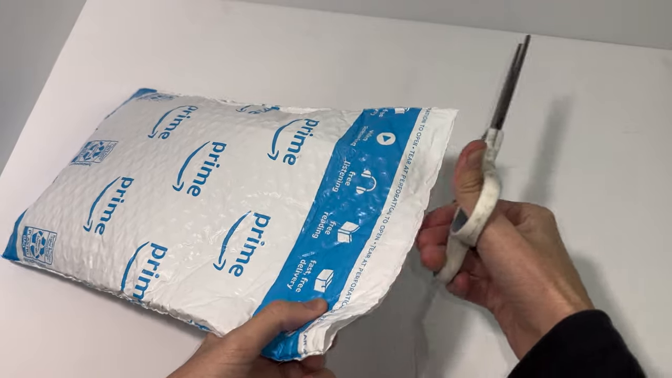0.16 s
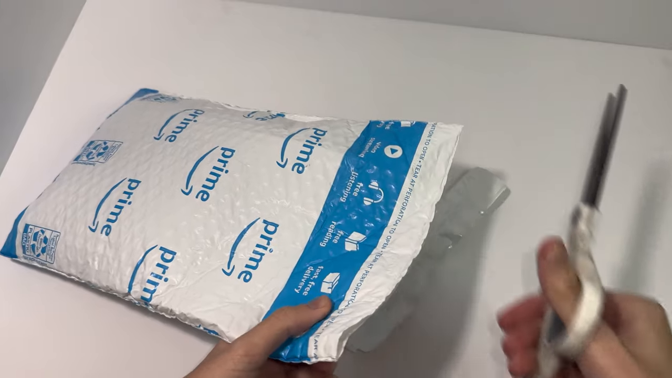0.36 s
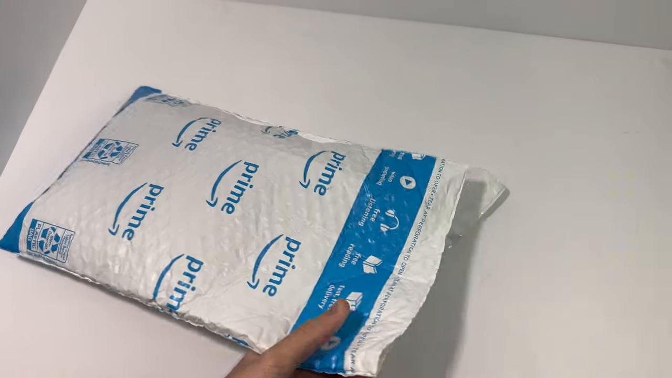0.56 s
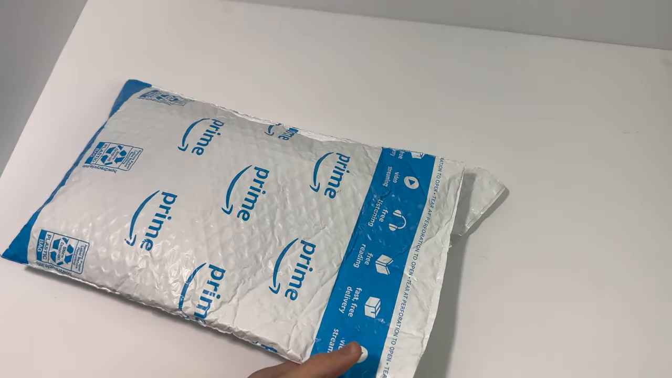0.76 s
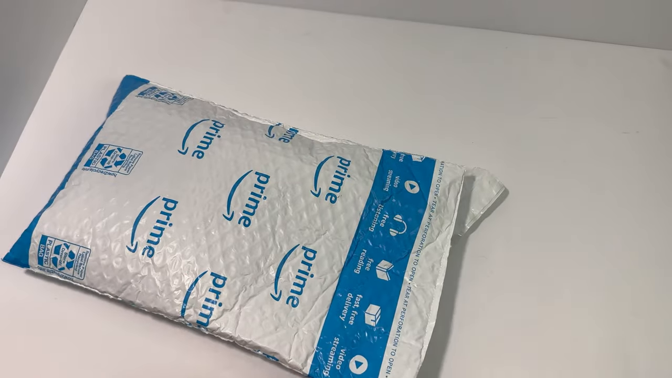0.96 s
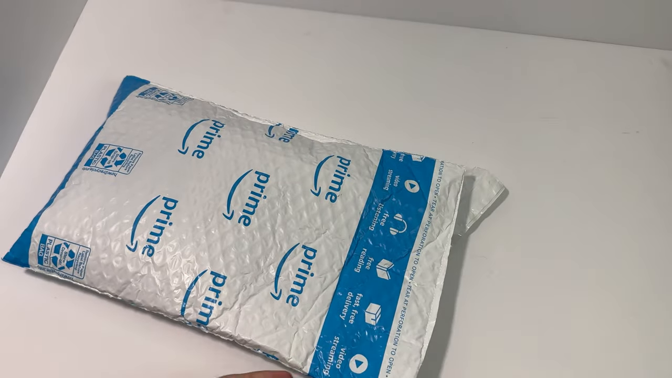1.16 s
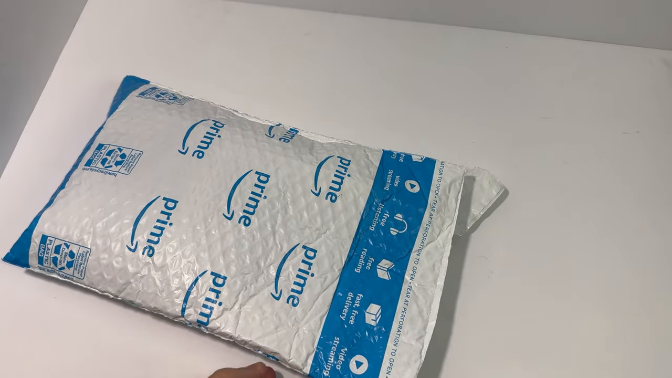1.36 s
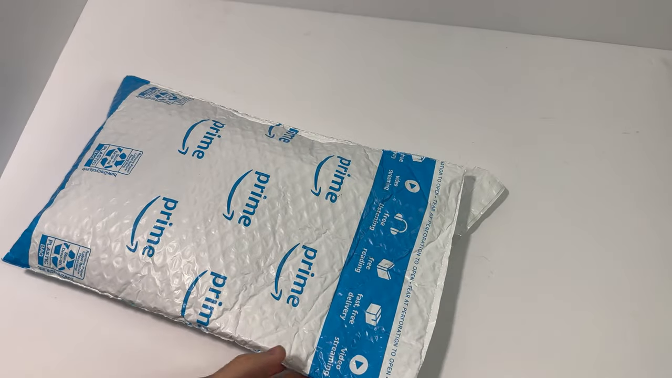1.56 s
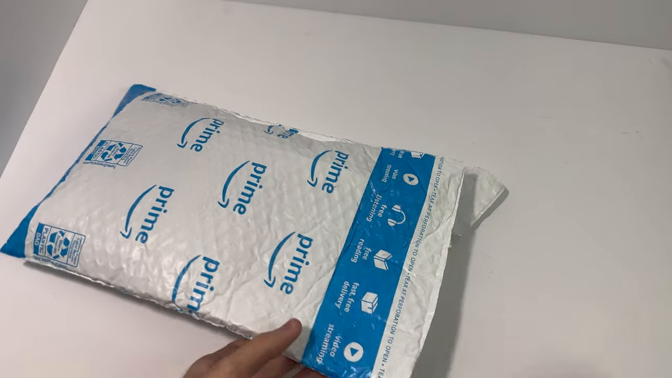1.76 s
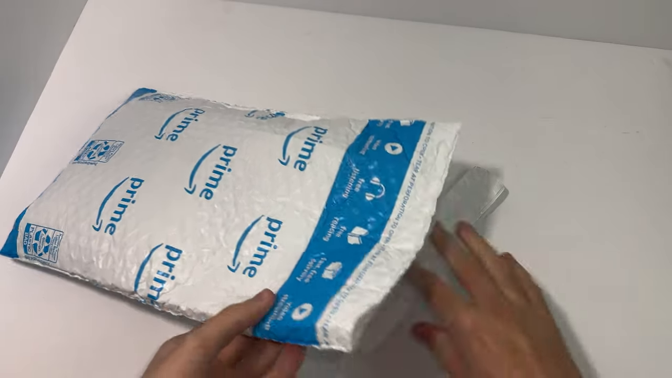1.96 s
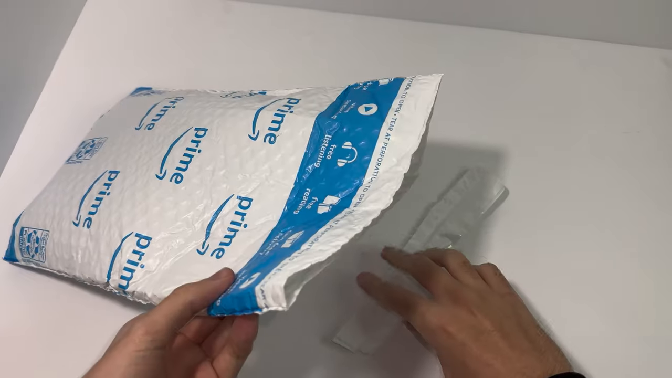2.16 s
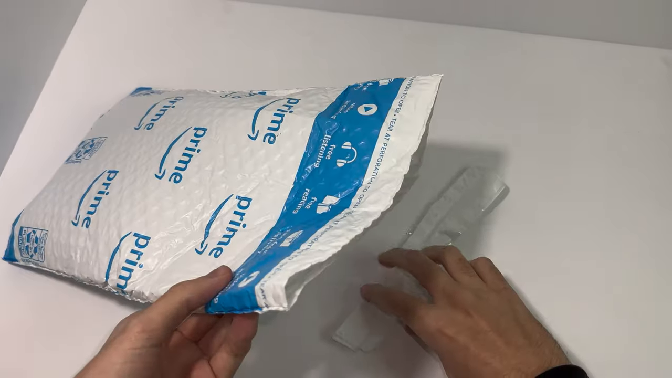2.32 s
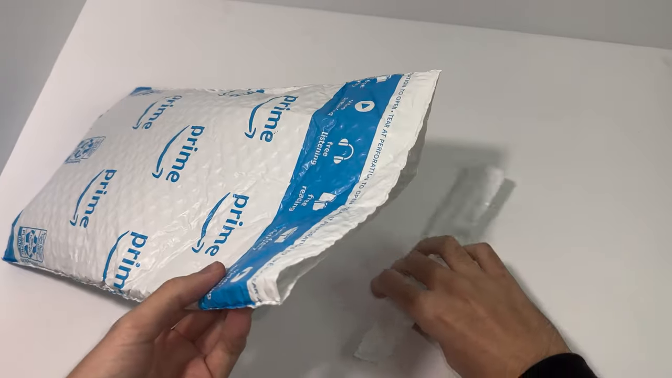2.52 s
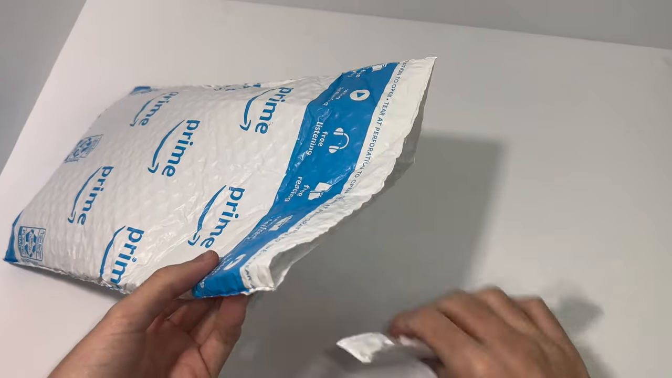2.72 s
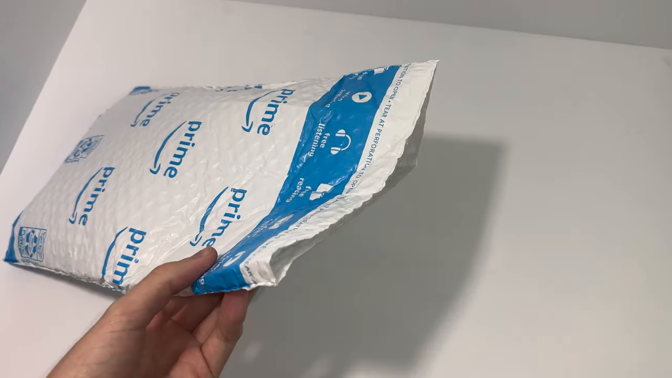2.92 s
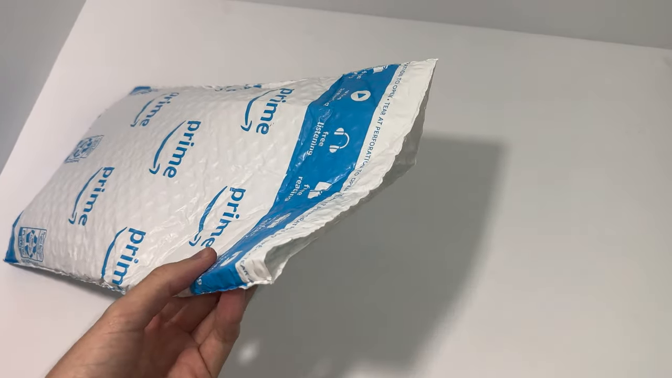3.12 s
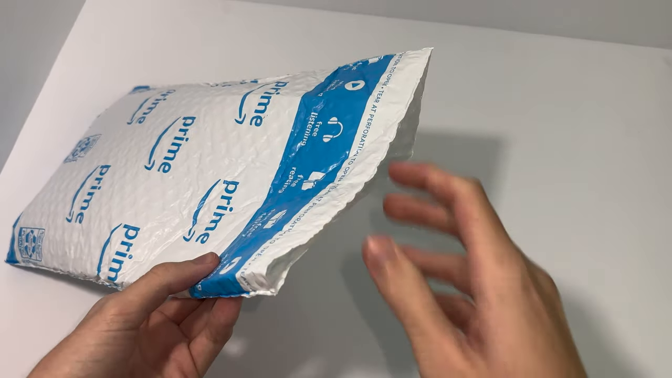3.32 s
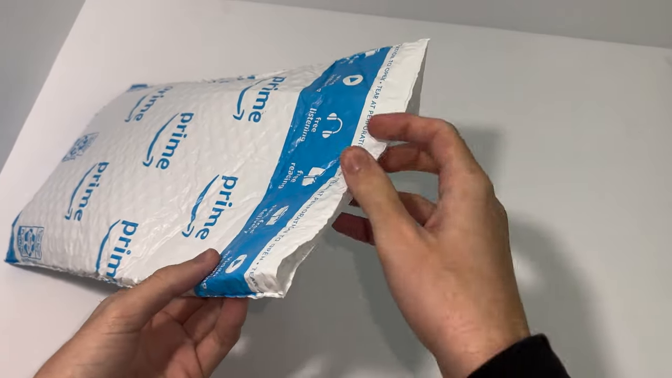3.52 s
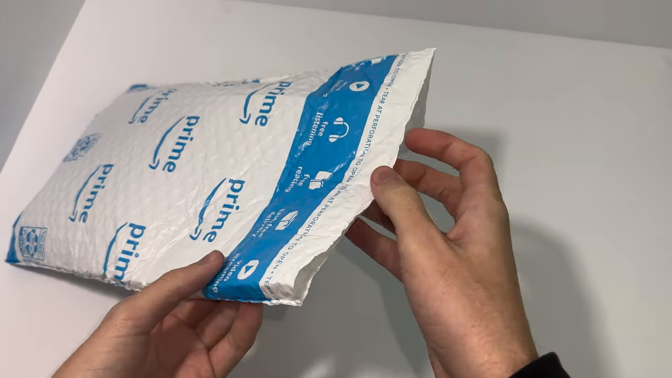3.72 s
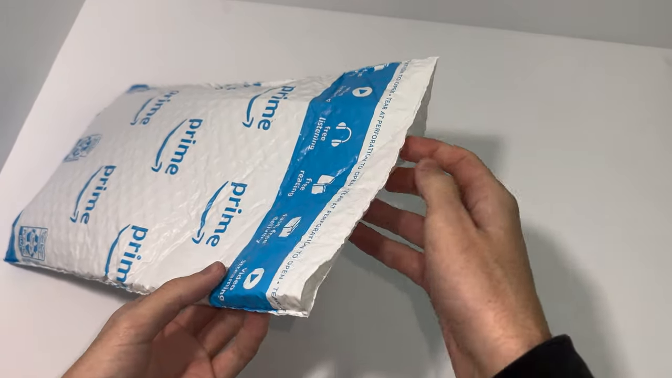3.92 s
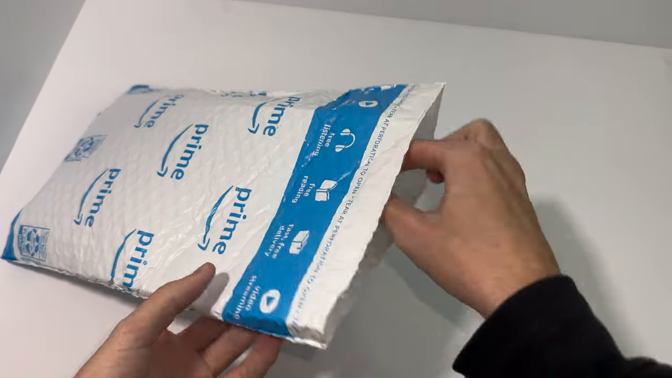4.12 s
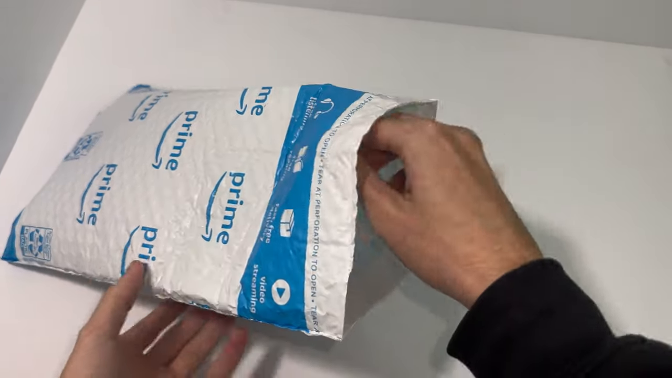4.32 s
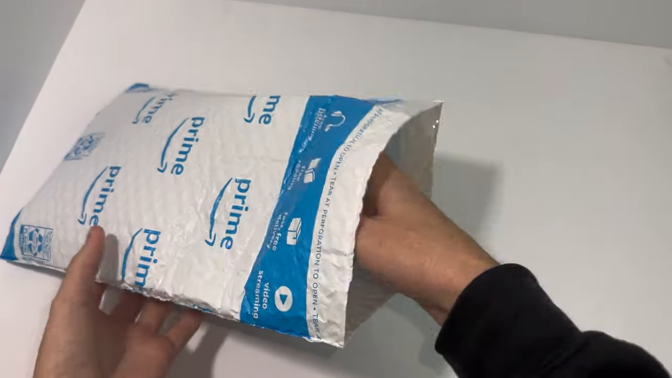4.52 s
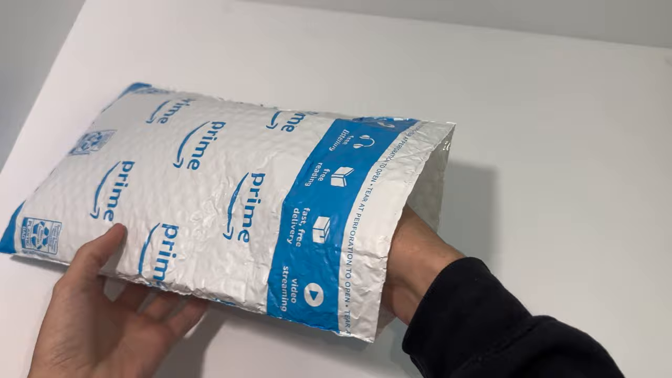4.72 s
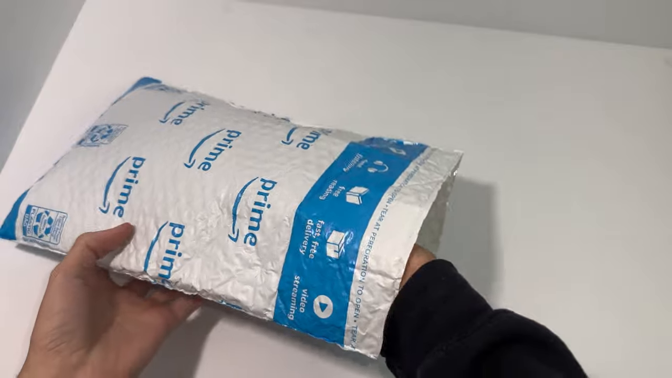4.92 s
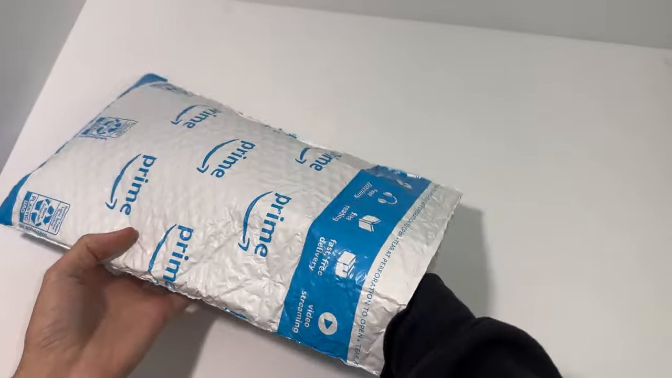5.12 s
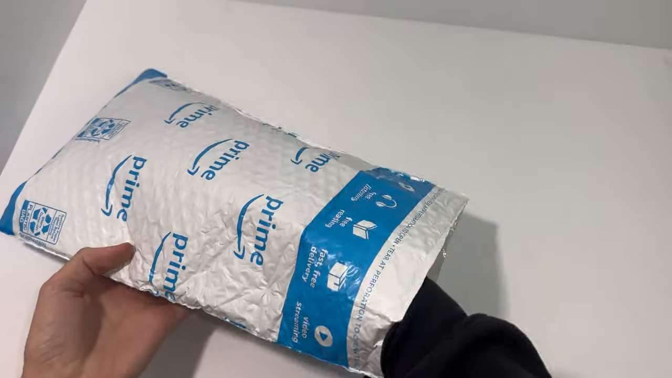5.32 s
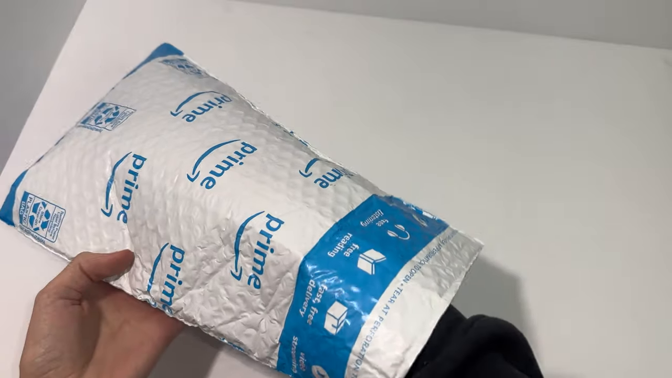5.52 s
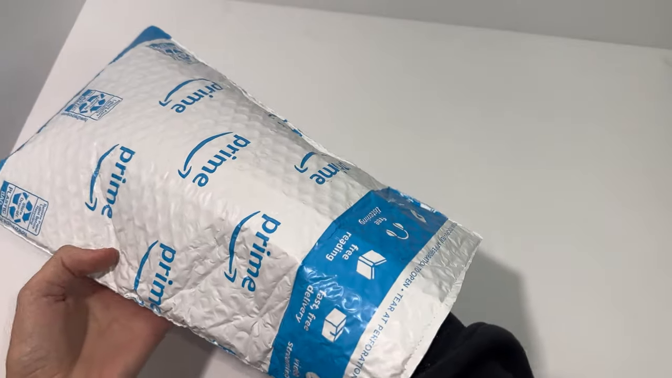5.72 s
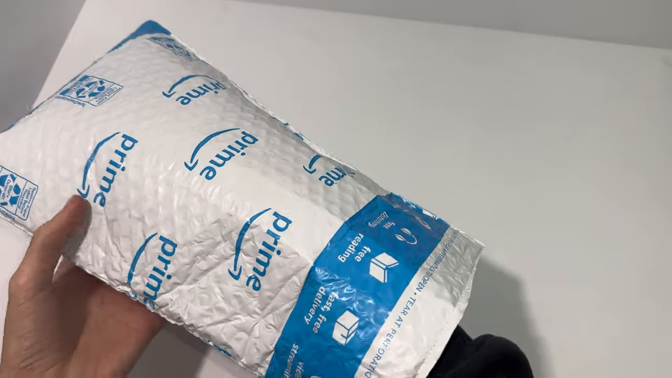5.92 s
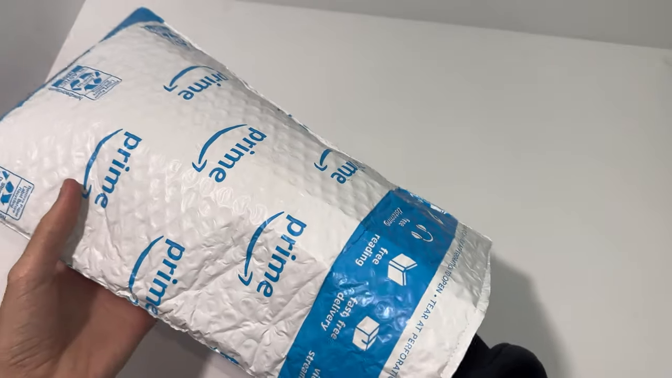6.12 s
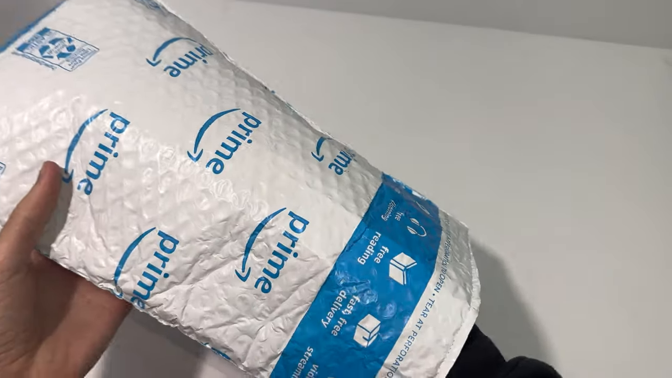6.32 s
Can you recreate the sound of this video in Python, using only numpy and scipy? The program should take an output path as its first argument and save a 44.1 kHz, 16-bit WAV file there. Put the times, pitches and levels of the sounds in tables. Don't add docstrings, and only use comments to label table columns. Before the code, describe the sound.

Bright, dry film snaps over soft bag rustle, then a short lull broken by scissors thudding twice on a resonant tabletop, the loudest moment. A few crinkles and a faint hiss as a cut strip is picked up, near quiet, then busy crackling as fingers open the padded bag and push deep inside. Small room, close microphones, soft fan behind.

```python
import sys
import numpy as np
from scipy import signal
from scipy.fft import rfft, irfft, next_fast_len
from scipy.io import wavfile
from scipy.ndimage import uniform_filter1d

SR = 44100
rng = np.random.default_rng(int(sys.argv[2]) if len(sys.argv) > 2 else 0)


def pcm_store(signal):
    levels = np.round(np.clip(np.atleast_2d(signal), -1, 1) * 32767)
    wavfile.write(sys.argv[1], SR, levels.astype(np.int16).T)


def to_linear_factor(level_db):
    exponent = np.asarray(level_db, float) / 20
    return 10 ** exponent


N = 280917

# [s, dB, dB]
SNAPS_CUT = [(0.0192, -27.5, 0), (0.0546, -15.5, 1.5), (0.105, -22, 10), (0.1334, -26, 10),
             (0.1711, -17.5, -7), (0.2235, -29, 5), (0.2666, -20.5, -3), (0.2754, -22.5, 6),
             (0.348, -27, -16), (0.3843, -22, 0.5), (0.4215, -24, 7), (0.45, -26, -6), (0.475, -24, 1),
             (0.4962, -19.5, -0.5), (0.5198, -13.5, 4), (0.554, -31, -11), (0.5752, -23, -4),
             (0.6045, -32, -14), (0.6875, -29.5, -1.5), (0.71, -33, 8), (0.7325, -28, -3.5),
             (0.775, -35.5, -11), (0.788, -28.5, 3), (0.871, -38, -14), (0.89, -34.5, -6.5),
             (0.9118, -34.5, -6), (0.9745, -35, -9), (0.987, -29.5, -7.5), (1.0823, -23, 6)]
# [s, dB, dB]
SNAPS_LIFT = [(1.2657, -30, -10), (1.295, -17, -21.5), (1.407, -44.5, -25), (1.4378, -41.5, 2),
              (1.5045, -37.5, -35), (1.529, -32.5, 0), (1.69, -33.5, -15), (1.695, -34, -6),
              (1.698, -35, -9), (1.723, -29.5, -3), (1.7973, -37, -11), (1.8372, -28.5, -11),
              (1.8446, -18.5, 3.5), (1.863, -30, -1), (1.8816, -17.5, -1.5), (1.932, -30.5, -7),
              (1.971, -17.5, 5.5), (1.9799, -21, -3), (2.011, -21.5, 2), (2.06, -28.5, 3), (2.08, -23, 1),
              (2.104, -32, 2), (2.171, -43, -19)]
# [s, dB, dB]
SNAPS_HELD = [(2.247, -33, -10), (2.2991, -33.5, -6), (2.366, -39, -4), (2.38, -29, -6.5),
              (2.4894, -30.5, -7), (2.623, -33, 3), (2.678, -30, 4), (2.84, -28, -2), (2.934, -38.5, -22),
              (2.9655, -35, -9), (2.998, -28.5, 3), (3.094, -39.5, -28), (3.147, -39, -4),
              (3.261, -41, -19)]
# [s, dB, dB]
SNAPS_OPEN = [(3.362, -38, -24), (3.378, -25.5, 9), (3.385, -16.5, -0.5), (3.391, -16.5, 19),
              (3.411, -14.5, 5.5), (3.5245, -22.5, 2), (3.551, -23, -0.5), (3.614, -25.5, 5),
              (3.647, -33.5, -15), (3.656, -30, 7), (3.696, -22, 4.5), (3.7634, -42, 0), (3.8298, -25, -1),
              (3.844, -33, 3), (3.8836, -28.5, 9), (3.8911, -29, -3), (4.015, -29, 2), (4.064, -19, 8),
              (4.0838, -11.5, 4), (4.1546, -18.5, 2), (4.181, -17.5, 10), (4.2458, -21.5, 2),
              (4.276, -21, 4), (4.3195, -18.5, 4.5), (4.3597, -27.5, -5), (4.413, -19, -3),
              (4.4428, -25, 6), (4.4516, -23, -2), (4.485, -23.5, 6), (4.4985, -21.5, 0.5)]
# [s, dB, dB]
SNAPS_REACH = [(4.5466, -28.5, 4), (4.564, -25, 8), (4.589, -28, 5), (4.606, -23, -5), (4.626, -24, 8),
               (4.6958, -13.5, -1), (4.7858, -26.5, 8), (4.934, -21, 1.5), (4.969, -22.5, -1),
               (5.0109, -17, -3), (5.077, -20, 0), (5.178, -26, 21), (5.3058, -27, -26),
               (5.3538, -12.5, 19), (5.4022, -18.5, -12), (5.4328, -21, 0), (5.7268, -19.5, -4.5),
               (5.915, -23, -1), (5.972, -27, 10), (6.178, -23, -17), (6.2413, -47, 4),
               (6.276, -22.5, -4.5),
               (4.9095, -27, -1), (4.996, -23, -4), (5.096, -22, 7), (5.1314, -36, 1), (5.148, -23, -2),
              (5.17, -26, -3), (5.249, -21, -6), (5.3332, -19, -8), (5.341, -16.5, 3), (5.5605, -26, 4),
              (5.3584, -16, 11), (5.3685, -26, 6), (5.422, -24, -11), (5.4379, -28, 0), (5.484, -21.5, -14),
              (5.6172, -34, -7), (5.875, -21, 6), (5.757, -36, -8), (5.835, -18.5, 2), (5.911, -15.5, -4.5),
              (5.9905, -31, 2), (6.0466, -20, -7), (6.109, -23, 1), (6.1336, -25, -13), (6.21, -37, -13),
              (6.077, -26, 4)]
# [s, dB, dB]
SNAPS_MORE = [(0.2549, -40, -6), (0.397, -42, -1), (0.4074, -29, -4), (0.8333, -41, -16), (0.8943, -38, 0),
              (0.9402, -47, -11), (1.6127, -65, -5), (1.7524, -38, -16), (1.9509, -36, -9),
              (2.4304, -44, -9), (2.51, -45, 2), (2.528, -39, -1), (2.5794, -32.5, 1), (2.7192, -41, -9),
              (2.7374, -37, -2), (2.7451, -39.5, -7), (3.0649, -47, -11), (3.084, -42.5, -8),
              (3.1865, -44, -8), (3.2161, -38, -6), (3.2485, -42, -5), (3.3046, -50, -12),
              (3.332, -47, -12), (3.6831, -33, 4), (3.9186, -49, 4), (3.965, -43, 2), (4.0023, -35, 2),
              (4.038, -29.5, 9), (4.044, -28, 14), (4.2042, -22, 3), (4.4738, -26, 4.5),
              (4.6509, -21.5, 7), (4.7653, -37, 3.5), (4.8025, -29, -2), (4.8473, -28, -1),
              (4.864, -21.5, 3)]
# f/Hz, level/dB
FILM_SPECTRUM = [(300, -20.5), (1000, -3.5), (2000, 1), (3500, 0), (5500, -1.5), (7500, -0.5),
                 (10500, -1.5), (13500, -13), (16000, -7.5)]
# f/Hz, level/dB
BAG_SPECTRUM = [(150, -2.5), (350, -3), (700, -2.5), (1200, 1.5), (1800, -3.5), (2600, -8.5), (5000, -45)]

# t/s, length/s, effort level/dB, bag air level/dB re effort
STROKES_OUTSIDE = [(0, 0.24, -54, 6.5), (0.348, 0.21, -51.5, -17), (0.563, 0.036, -43.5, 3),
                   (0.644, 0.18, -56.5, 0.5), (0.856, 0.29, -67.5, 7), (1.746, 0.094, -57.5, 8),
                   (1.855, 0.073, -41, -12.5), (1.958, 0.085, -50.5, 2.5), (2.094, 0.27, -64, 7),
                   (2.423, 0.028, -54.5, -21), (2.513, 0.055, -51.5, -23), (2.685, 0.052, -58.5, 5.5),
                   (2.823, 0.65, -69.5, 5.5), (3.208, 0.028, -61, 9.5)]
# t/s, length/s, effort level/dB, bag air level/dB re effort
STROKES_INSIDE = [(3.399, 0.034, -38.5, -1.5), (3.449, 0.097, -47.5, 2.5), (3.56, 0.16, -59, 1.5),
                  (3.79, 0.11, -59.5, 0), (3.939, 0.1, -55.5, 6), (4.06, 0.041, -38.5, 1.5),
                  (4.161, 0.072, -38.5, -3), (4.213, 0.28, -46.5, 2), (4.544, 0.087, -47, 3),
                  (4.657, 0.063, -34.5, -2), (4.796, 0.023, -47, 4), (4.863, 0.08, -39, 1.5),
                  (4.998, 0.042, -38, 2), (5.088, 0.18, -35.5, -3), (5.305, 0.064, -34, 1),
                  (5.417, 0.28, -36, 1), (5.765, 0.027, -35, 5.5), (5.821, 0.18, -36.5, 1.5),
                  (6.023, 0.43, -40, 1)]
# t/s, length/s, level/dB
SLIDES = [
    (2.514, 0.073, -52.5),
    (2.625, 0.0089, -53),
    (4.88, 0.4, -48.5),
    (5.304, 0.45, -43.5),
    (5.753, 0.26, -44.5),
    (6.03, 0.49, -51.5),
]

# t/s, peak level/dB, f/Hz favoured by the spot, clack level/dB re blow
KNOCKS = [(0.054, -19.5, 364, -4), (0.062, -19.5, 117, -47), (0.174, -23.5, 313, -4),
          (0.5755, -20, 1200, -5), (1.2659, -19, 900, 3), (1.2642, -8, 242, -30), (1.268, -12.5, 446, -30),
          (1.269, -10, 106, -24), (1.293, -6.5, 503, -9.5), (1.301, -11, 720, -10), (1.5025, -22, 790, -14),
          (1.5035, -24, 380, -30), (1.5092, -10.5, 259, -33), (2.079, -33, 810, 5.5),
          (2.429, -36, 410, -24), (3.384, -40, 300, 6), (3.461, -33.5, 330, -13), (4.09, -37, 197, -20),
          (3.95, -33.5, 765, -21), (3.973, -33, 806, -25), (4.082, -26.5, 260, 3.5), (4.194, -39, 780, 15),
          (4.797, -28, 312, -4.5), (5.1, -26.5, 406, 2), (5.321, -28, 426, -16.5), (5.772, -27, 490, 4),
          (5.787, -21.5, 597, 3.5), (6.038, -26, 365, -6)]
# t/s, peak level/dB, f/Hz of spot, clack level/dB re blow
KNOCKS_FAR = [
    (1.2945, -3, 193, -16),
    (1.2972, -8.5, 360, -21),
    (1.294, -13, 124, -33),
]
# f/Hz, level/dB, t60/s
TABLE_MODES = [(65, 8.5, 0.11), (89.5, -1.5, 0.16), (126, 2, 0.08), (133, -5.5, 0.15), (154, -3, 0.22),
               (200.6, 0, 0.19), (248.2, -2.5, 0.18), (345, -2.5, 0.14), (436.5, -2.5, 0.082),
               (535, -12.5, 0.072), (674, -6.5, 0.082), (825, 5, 0.092), (1017, 3, 0.039),
               (1263, 15, 0.024)]

# f/Hz, lead/rad
PORT_LEAD = [(0, 0), (1400, .5), (2200, 0), (3100, -1.3), (4800, -.4), (5500, -1.8), (6300, -.5),
             (7200, .1), (8300, 2.7), (9300, 3.5), (10500, 5.9), (11900, 6.7), (12900, 9.1), (14000, 9.8),
             (15000, 12.2), (22050, 12.6)]
# f/Hz, t60/s
ROOM_T60 = [(200, 0.16), (1000, 0.32), (4000, 0.22), (9000, 0.12), (14000, 0.11)]
# f/Hz, level/dB
AIR_SPECTRUM = [(15, -22), (25, -43), (64, -2), (194, -3.5), (249, -7.5), (481, -17.5), (668, -21.5),
                (952, -19.5), (1080, -31.5), (7010, -45.5), (8580, -86), (10500, -74), (13600, -93),
                (22000, -120)]
# f/Hz, width/Hz, level/dB
FAN_HUM = [(52.2, 15.3, -47), (140.7, 22.5, -47), (274, 13.6, -61.5)]
# f/Hz, correlation [0..1]
AIR_LIKENESS = [(60, 0.83), (150, 0.96), (280, 0.73), (600, 0.067), (2000, 0.13), (8000, 0.16)]
TREBLE_EDGES_HZ = [0, 6900, 8270, 9650, 11000, 11700, 12400, 13100, 14500, 15200]

SHARP_HZ, DB_PER_OCTAVE, PATCH_OCTAVES = 7800, 12, 0.078
SNAP_MS, SNAP_SPREAD = 3.07, 0.45
GRIP_DB_PER_S, RELEASE_DB_PER_S = 607, 321
REST_FILM_DB, REST_BAG_DB = -75, -64.5
SLIDE_ON_DB_PER_S, SLIDE_OFF_DB_PER_S = 970, 670
SPREAD, QUICK_HZ = 0.1717, 2510
SCISSORS_FROM_S, SCISSORS_TO_S, LEFT_LATE_S = 1.2, 1.7, 0.00027
AIR_DB = -40
EDGE_HZ, SHARP_EDGE_HZ, FRAME_START = 15950, 16800, 590


def evened(x):
    return x / np.sqrt(np.mean(x ** 2) + 1e-20)


def read(points, hz):
    f, value = np.transpose(points)
    return np.interp(np.log(hz + 1), np.log(f + 1), value)


def add(mix, s, sound):
    part = mix[round(s * SR):][:len(sound)]
    part += sound[:len(part)]


def coloured(x, points):
    size = next_fast_len(x.shape[-1])
    gain = to_linear_factor(read(points, np.fft.rfftfreq(size, 1 / SR)))
    return irfft(rfft(x, size) * gain, size)[..., :x.shape[-1]]


def snaps():
    events = SNAPS_CUT + SNAPS_LIFT + SNAPS_HELD + SNAPS_OPEN + SNAPS_REACH + SNAPS_MORE
    s, db, sharp_db = np.transpose(events)[:, :, None]
    t, hz = np.arange(2048) / SR, np.fft.rfftfreq(2048, 1 / SR)
    film_noise, bag_noise, slip_noise, patch_noise = rng.standard_normal((4, len(s), 2048))
    octaves = np.minimum(sharp_db, 2) / DB_PER_OCTAVE + PATCH_OCTAVES * patch_noise[:, -1:]
    ring_hz = SHARP_HZ * 2 ** octaves
    ms = SNAP_MS * np.exp(SNAP_SPREAD * patch_noise[:, -2:-1])

    patch_db = 0.8 * np.exp(-(np.log((hz + 1) / ring_hz) / 0.45) ** 2)
    patch_db += 7.2 * uniform_filter1d(patch_noise[:, :len(hz)], 40)
    patch_db += (sharp_db + 1.5) * np.clip(np.log2((hz + 1) / 5500), 0, 1)
    patch_db += (0.29 * sharp_db + 2.0) * np.clip(np.log2((hz + 1) / 4500), -3, 0)
    film = irfft(rfft(film_noise) * to_linear_factor(read(FILM_SPECTRUM, hz) + patch_db))
    film = film * to_linear_factor(20.0 * uniform_filter1d(slip_noise, 30))
    decay = np.exp(-(t / ms / 0.00071) ** 2) + 0.04 * np.exp(-t / 0.015)
    film = film * decay * np.minimum(t / ms / 0.0011, 1) ** 1.36

    bag = irfft(rfft(bag_noise) * to_linear_factor(read(BAG_SPECTRUM, hz)))
    bag = bag * np.exp(-t / 0.0096) * np.minimum(t / 0.00069, 1)
    bag_db = -23.0 - 0.68 * sharp_db
    bursts = film / abs(film).max(axis=1, keepdims=True)
    bursts = bursts + to_linear_factor(bag_db) * bag / abs(bag).max(axis=1, keepdims=True)
    out = np.zeros(N)
    for start, burst in zip(s[:, 0], to_linear_factor(db + 0.5) * bursts):
        add(out, start, burst)
    return out


def grains(per_s, spread_db, clump_db, lo_hz, hi_hz, cycles, count=20):
    clumps = evened(uniform_filter1d(uniform_filter1d(rng.standard_normal(N), 160), 160))
    size = to_linear_factor(spread_db * np.minimum(rng.exponential(1, N), 4) + clump_db * clumps)
    size = size * (rng.random(N) < per_s / SR) * rng.choice([-1, 1], N)
    patch, out = rng.integers(0, count, N), np.zeros(N)
    for k, hz in enumerate(np.geomspace(lo_hz, hi_hz, count)):
        r, turn = np.exp(-hz / cycles / SR), 2 * np.pi * hz / SR
        ringing = [1, -2 * r * np.cos(turn), r * r]
        out += signal.lfilter([np.sin(turn) * hz / hi_hz], ringing, size * (patch == k))
    return out


def rustle():
    start, length, effort_db, bag_db = np.transpose(STROKES_OUTSIDE + STROKES_INSIDE)[:, :, None]
    t, now = np.arange(0, N, 64) / SR, np.arange(N) / SR
    effort_db = effort_db - GRIP_DB_PER_S * np.maximum(start - t, 0)
    effort_db = effort_db - RELEASE_DB_PER_S * np.maximum(t - start - length, 0)
    film_gain = np.sqrt((to_linear_factor(effort_db) ** 2).sum(axis=0) + to_linear_factor(REST_FILM_DB) ** 2)
    bag_gain = np.sqrt((to_linear_factor(effort_db + bag_db) ** 2).sum(axis=0) + to_linear_factor(REST_BAG_DB) ** 2)
    film = evened(coloured(grains(2600, 2.6, 2.26, 1450, 14900, 0.99), FILM_SPECTRUM))
    bag = evened(coloured(grains(2500, 2.23, 3.15, 258, 2850, 1.09), BAG_SPECTRUM))
    film = to_linear_factor(-1.5) * np.interp(now, t, film_gain) * film
    return film + to_linear_factor(-4.5) * np.interp(now, t, bag_gain) * bag


def slides():
    start, length, db = np.transpose(SLIDES)[:, :, None]
    t = np.arange(0, N, 64) / SR
    db = db - SLIDE_ON_DB_PER_S * np.maximum(start - t, 0)
    db = db - SLIDE_OFF_DB_PER_S * np.maximum(t - start - length, 0)
    gain = np.interp(np.arange(N) / SR, t, to_linear_factor(db).sum(axis=0))
    noise = evened(coloured(rng.standard_normal((3, N)), FILM_SPECTRUM))
    return gain * (ports(noise[0]) + to_linear_factor(-5.0) * noise[1:])


def knocks():
    hz, db, t60 = np.transpose(TABLE_MODES)[:, :, None]
    t, out, bins = np.arange(SR // 2) / SR, np.zeros(N), np.fft.rfftfreq(4096, 1 / SR)
    slow = np.minimum(bins, QUICK_HZ)
    lag = 2 * np.pi * SPREAD * (2 * np.sqrt(slow) - slow / np.sqrt(QUICK_HZ)) + 1.63
    late = np.maximum(t - SPREAD * (1 / np.sqrt(hz) - 1 / np.sqrt(QUICK_HZ)), 0)
    swell = (1 - np.exp(-late * hz / 0.52)) * (1 + 2.6 * np.exp(-late / 0.0046))
    modes = to_linear_factor(db - 60 * late / t60) * swell * np.cos(2 * np.pi * hz * t - np.interp(hz, bins, lag))
    blows = KNOCKS + KNOCKS_FAR
    clacks = rng.standard_normal((len(blows), 2048))
    sides = [1] * len(KNOCKS) + [-1] * len(KNOCKS_FAR)
    for (s, blow_db, spot_hz, clack_db), noise, side in zip(blows, clacks, sides):
        ring = (to_linear_factor(-21.0 * np.log2(hz / spot_hz) ** 2) * modes).sum(axis=0)
        sweep_gain = to_linear_factor(-14.0 * np.log2((bins + 1) / spot_hz) ** 2)
        sweep = irfft(sweep_gain * np.exp(-1j * lag))[:2048]
        clack = coloured(noise, BAG_SPECTRUM) * np.exp(-t[:2048] / 0.0079)
        add(out, s, to_linear_factor(blow_db - 5.5) * side * ring / abs(ring).max())
        add(out, s, to_linear_factor(blow_db - 9.0) * side * sweep / abs(sweep).max())
        add(out, s, to_linear_factor(blow_db + clack_db) * clack / abs(clack).max())
    return out


def ports(x):
    size = next_fast_len(N)
    lead = np.interp(np.fft.rfftfreq(size, 1 / SR), *np.transpose(PORT_LEAD))
    return irfft(rfft(x, size) * np.exp(0.5j * np.outer([1, -1], lead)), size)[:, :N]


def room(x, turns_per_s):
    at, out = np.arange(30, SR // 3 - 20, 20), 0
    for k in range(6):
        taps = np.zeros((2, SR // 3))
        places = at + rng.integers(0, 20, (2, len(at)))
        np.put_along_axis(taps, places, rng.choice([-1.0, 1.0], (2, len(at))), 1)
        hz, t, z = signal.stft(taps, SR, nperseg=256)
        tail = signal.istft(z * to_linear_factor(-60 * t / read(ROOM_T60, hz)[:, None]), SR, nperseg=256)[1]
        tail = tail * (1 + 5.4 * np.exp(-np.arange(tail.shape[1]) / SR / 0.0021))
        tail = tail / np.linalg.norm(tail, axis=1, keepdims=True)
        turns = turns_per_s * (1 + k / 4) * np.arange(N) / SR + k / 3
        share = np.sqrt(1 / 3) * np.cos(np.pi * turns)
        out = out + signal.oaconvolve((x * share)[None], tail, axes=1)
    return out[:, :N]


def air():
    frames, hz = N // 512 + 6, np.fft.rfftfreq(2048, 1 / SR)
    a, b, c, d, patches = rng.standard_normal((frames, 1025, 5)).T
    patches = evened(uniform_filter1d(uniform_filter1d(patches, 10, 0), 6, 1))
    same = np.clip(read(AIR_LIKENESS, hz), -1, 1)[:, None]
    left = a + 1j * b
    z = np.array([left, same * left + np.sqrt(1 - same ** 2) * (c + 1j * d)])
    z = z * to_linear_factor(read(AIR_SPECTRUM, hz)[:, None] + 2.6 * patches)
    wash = signal.istft(z, nperseg=2048, noverlap=1536)[1][:, :N]
    out, t = to_linear_factor(AIR_DB - 6.5) * evened(wash), np.arange(N) / SR
    for f, width, db in FAN_HUM:
        r = np.exp(-np.pi * width / SR)
        slow = rng.standard_normal(N) + 1j * rng.standard_normal(N)
        slow = signal.lfilter([1], [1, -r], signal.lfilter([1], [1, -r], slow))
        out = out + to_linear_factor(db) * evened((slow * np.exp(2j * np.pi * f * t)).real)
    return out


def scene():
    mailer, table, t = rustle() + snaps(), knocks(), np.arange(N) / SR
    scissors = table * (t > SCISSORS_FROM_S) * (t < SCISSORS_TO_S)
    near = ports(mailer + table - scissors)
    near = near + [np.roll(scissors, round(LEFT_LATE_S * SR)), scissors]
    table_echo = coloured(table, [(60, -13), (400, 1.5), (2000, 3.5)])
    near = near + room(to_linear_factor(-3.0) * mailer + to_linear_factor(-10.5) * table_echo, 5.0)
    return (near + air() + slides()) * to_linear_factor([[-0.55], [0.55]])


def thrifty(dry, weaker_db, faint_db, from_hz, faint_hz, sharp_db):
    hz, t, z = signal.stft([dry[0] + dry[1], dry[0] - dry[1]], SR, "cosine", nperseg=2048)
    band = np.searchsorted(TREBLE_EDGES_HZ, hz, "right") - 1
    power = np.add.reduceat(abs(z) ** 2, np.searchsorted(hz, TREBLE_EDGES_HZ), axis=1)
    power = power / np.bincount(band)[:, None]
    power_db = 10 * np.log10(power + 1e-20)[:, band]

    treble = uniform_filter1d((np.diff(dry, 2) ** 2).sum(axis=0), size=128)
    jumps = treble > to_linear_factor(2 * sharp_db) * uniform_filter1d(treble, size=1024, origin=511)
    around = uniform_filter1d(1.0 * jumps, size=640)
    sharp = np.interp(t * SR, np.arange(len(jumps)), around) > 0.01

    weak = (power_db < power_db[::-1] - weaker_db) & (hz[:, None] > from_hz) & ~sharp
    faint = (power_db < faint_db) & (hz[:, None] > faint_hz)
    kept = ~(weak | faint) & (hz[:, None] < np.where(sharp, SHARP_EDGE_HZ, EDGE_HZ))
    z = z * kept * to_linear_factor(-16.0 * (hz[:, None] > EDGE_HZ))
    total, gap = signal.istft(z, SR, "cosine", nperseg=2048)[1][:, :N]
    return np.array([total + gap, total - gap]) / 2


def low_pass(x):
    return signal.sosfilt(signal.butter(12, 16850, fs=SR, output="sos"), x)


def record(dry):
    framed = np.roll(dry, -FRAME_START, axis=1)
    kept = thrifty(framed, weaker_db=4.6, faint_db=-101.0, from_hz=8270, faint_hz=7500, sharp_db=7.0)
    return low_pass(np.roll(kept, FRAME_START, axis=1))


dry = scene()
out = record(dry)
pcm_store(out)
```